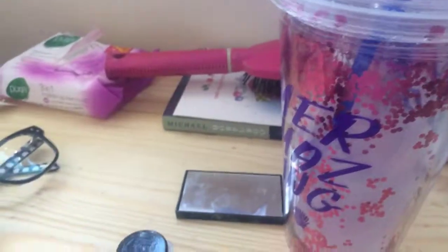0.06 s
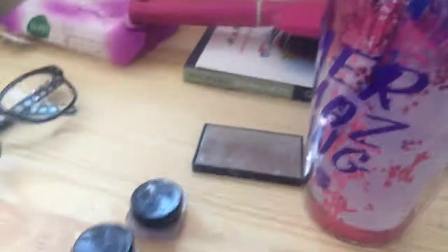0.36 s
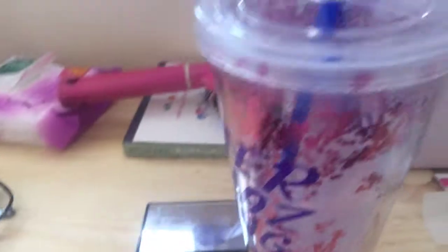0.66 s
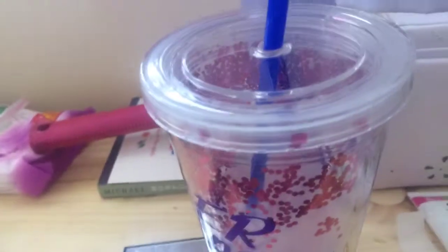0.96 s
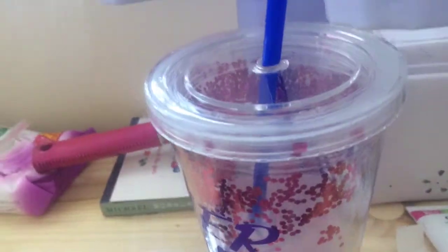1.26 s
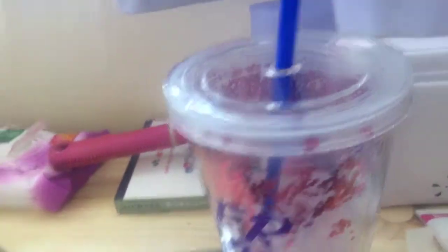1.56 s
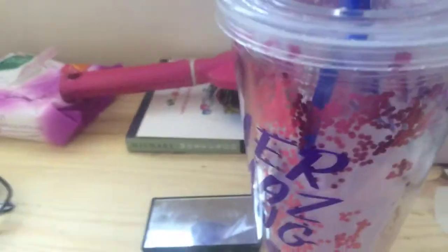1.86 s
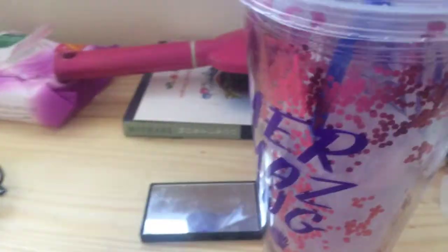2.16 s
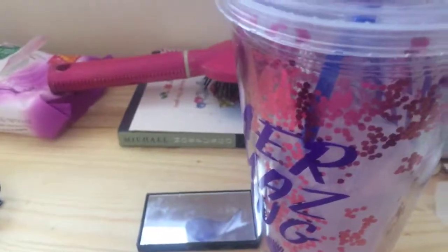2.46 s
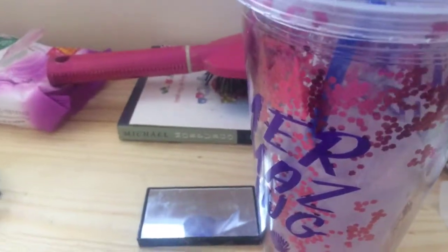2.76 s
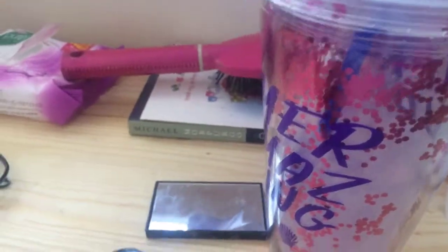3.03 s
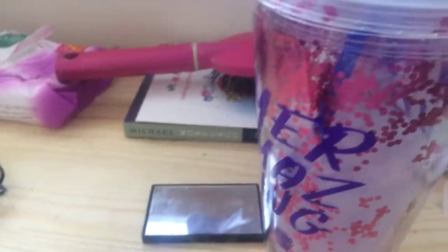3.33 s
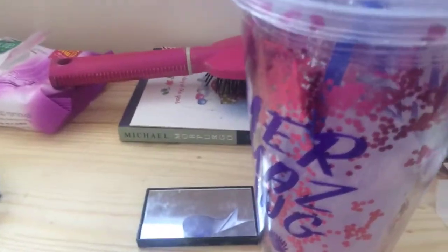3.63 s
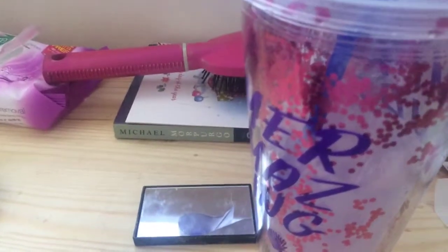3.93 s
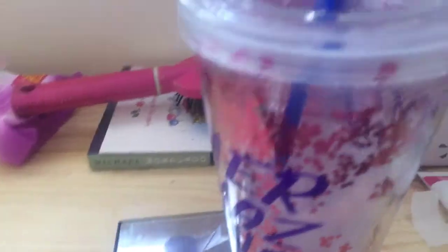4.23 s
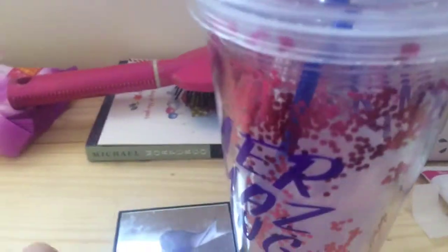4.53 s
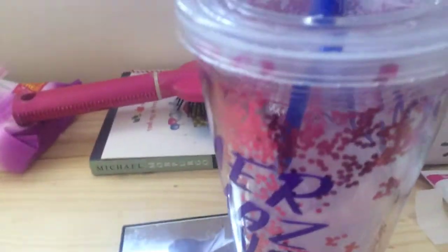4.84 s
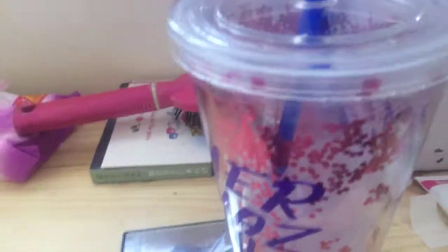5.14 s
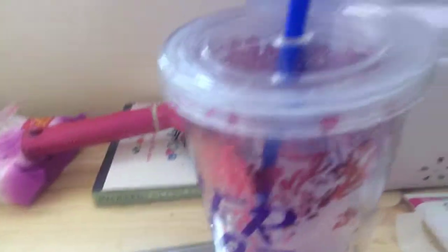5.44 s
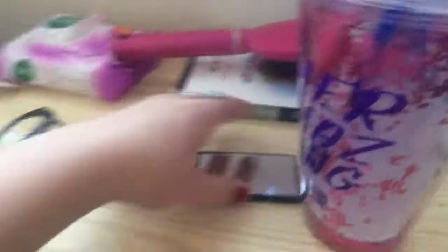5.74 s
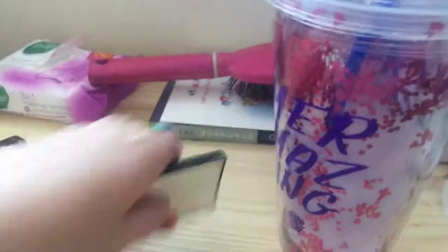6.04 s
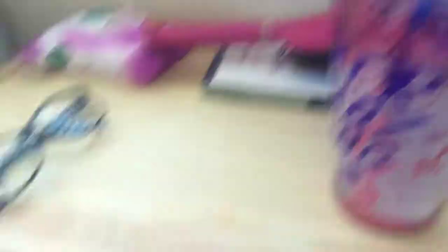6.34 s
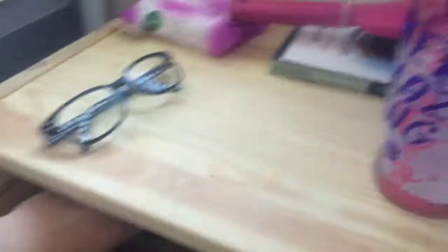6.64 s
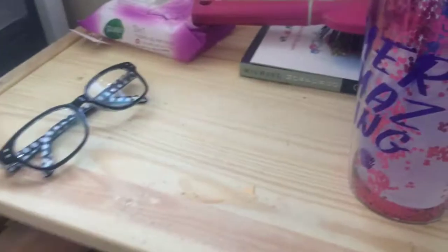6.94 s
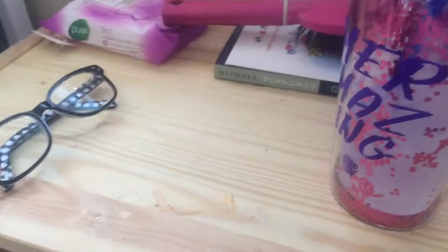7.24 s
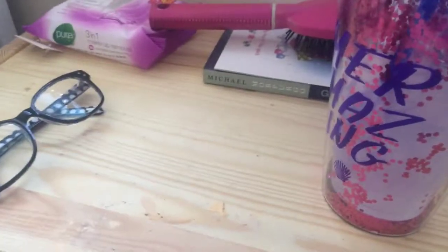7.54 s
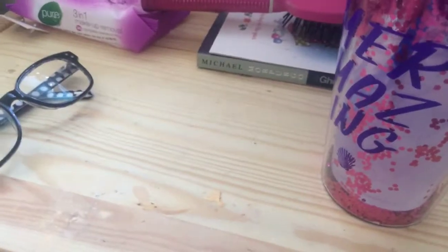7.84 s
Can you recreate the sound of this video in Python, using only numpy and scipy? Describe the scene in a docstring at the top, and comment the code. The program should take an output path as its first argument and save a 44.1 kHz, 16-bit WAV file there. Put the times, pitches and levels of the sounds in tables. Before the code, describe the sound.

Heard up close in a small, quiet room, someone arranges plastic compacts on a wooden desktop. They land with short, uneven clacks and knocks, with little slides and faint handling ticks between them. The activity eases in the middle, then picks up as one case is dragged, snaps sharply against plastic several times and is put down with a louder clack. A low room tone lies underneath.

```python
"""A wooden desk in a small furnished room, heard up close: plastic makeup cases are set down and nudged.
A palette is slid off the desk, knocked, handled with sharp clicks and clapped down among the others.
Hits are short bursts of chatter and slides are streams of tiny slips; both ring the desk top and the
cases, and the room answers. Faint ticks of handling sit over a bed of room tone and hiss."""
import sys
import numpy as np
from scipy import signal
from scipy.fft import rfft, irfft, next_fast_len
from scipy.io import wavfile
from scipy.ndimage import map_coordinates

SR = 44100
rng = np.random.default_rng(int(sys.argv[2]) if len(sys.argv) > 2 else 0)


def transcribe(signal):
    """Save signal, clipped to [-1, 1], as a 16-bit WAV file at the path in sys.argv[1]."""
    frames = np.atleast_2d(signal).T
    limited = np.clip(frames, -1, 1)
    pcm = np.round(limited * 32767).astype(np.int16)
    wavfile.write(sys.argv[1], SR, pcm)


N = 352426

# colour of the room tone and of the hiss: frequency_hz, relative_db
ROOM_TONE_COLOUR = [(15, -32.5), (25, -6.5), (66, 8.5), (149, 12), (309, -2), (591, -1.5), (911, -10.5),
                    (1230, -4), (1520, -11.5), (2350, -13.5), (2610, -15), (6210, -22), (14400, -20),
                    (16000, -24.5)]
HISS_COLOUR = [(500, -33), (2000, 11.5), (5000, 9), (9000, 8), (15500, 1)]
# level of the hiss over time, before its trim: time_s, level_db
HISS_LEVEL = [(0, -70), (0.551, -65.5), (.75, -77), (2.019, -75.5), (2.2, -61), (2.4, -57), (2.619, -72.5),
              (3.502, -69), (4.1, -71.5), (5.24, -75), (5.35, -53), (5.5, -81.5), (6.07, -67.5),
              (6.901, -71), (7.13, -60.5), (7.55, -72), (7.781, -69), (7.95, -54)]
# decay of the room tail: frequency_hz, t60_s
ROOM_DECAY = [(100, 0.44), (400, 0.16), (1500, 0.13), (5000, 0.11), (14000, 0.06)]
# modes of the desk top and of the plastic cases: pitch_hz, relative_db, t60_s
DESK_MODES = [(107.5, 6, 0.16), (142.1, 8.5, 0.31), (231, 6, 0.17), (300, 5, 0.024), (483.6, 0, 0.08),
              (627.5, 8, 0.022), (701, 1, 0.027), (1064, -1.5, 0.011), (1161, 3.5, 0.042),
              (1334, -4.5, 0.066)]
CASE_MODES = [(1630, 3.5, 0.035), (2100, 6, 0.0083), (2290, 3.5, 0.052), (2530, 7.5, .04),
              (2903, 9.5, 0.056), (3190, 6.5, 0.047), (3760, -2.5, 0.21), (4620, 1.5, .025),
              (4930, 1, 0.11), (6060, 8.5, .03), (7000, 8.5, 0.022), (11400, 3, 0.06)]

# fingers shift their grip and edges catch: start_s, end_s, level_db
FIDGETS = [(0.088, 0.292, -61), (0.42, .624, -71.5), (2.775, 3.208, -66.5), (3.899, 4.1, -71),
           (6.198, 6.507, -68.5), (6.9, 7.163, -59.5), (7.699, 7.862, -68)]
# sliding and handling: start_s, end_s, level_db, weight_db, hardness_db
RUBS = [(0.011, 0.044, -36, 8, -14), (0.389, 0.596, -62.5, 16, -22), (.70, 0.718, -49.5, 8, -12),
        (0.879, 0.955, -77.5, 11.5, 10), (1.308, 1.348, -45, 11.5, -10.5), (1.362, 1.465, -61, 10, -3.5),
        (1.632, 1.716, -92.5, 3.5, 21.5), (2.355, 2.397, -33.5, -1, -7), (2.444, 2.491, -45, 9, -9),
        (2.793, 3.003, -65.5, 13, -17), (2.997, 3.156, -67.5, 2, -3.5), (4.193, 4.256, -68.5, 1, 9.5),
        (4.263, 4.285, -51.5, 6, 5), (4.652, 4.746, -46, 5, -8), (4.933, 5.005, -58, 12, -3),
        (5.021, 5.114, -63, 12, -3), (5.11, 5.166, -57.5, -7.5, 8), (5.534, 5.607, -51, 2.5, -6.5),
        (5.62, 5.723, -71, -11, 6.5), (5.736, 5.742, -58, -40, -4.5), (5.757, 5.88, -69.5, -11, 3),
        (5.89, 6.017, -58.5, 6, 7.5), (5.998, 6.041, -40.5, -9, -7.5), (6.048, 6.153, -43, -13.5, 1),
        (6.225, 6.244, -68, -13, 12), (6.289, 6.453, -70, -1, 4), (6.53, 6.572, -66.5, 3, 11),
        (6.574, 6.657, -37, -3.5, 2), (6.65, 6.701, -33, 5.5, -17), (6.806, 6.824, -48, 5, 7.5),
        (7.126, 7.237, -48.5, 3, -17), (7.623, 7.876, -68.5, 15.5, -15.5), (7.718, 7.757, -67, 17.5, -3.5),
        (7.877, 7.98, -43.5, -8, -12.5)]
# a hand or padded edge bumps the desk: time_s, level_db, hardness_db
BUMPS = [(0.055, -33.5, -5), (1.740, -36.5, 2), (2.69, -45, 7.5), (3.016, -46, -26), (3.100, -54, 3),
         (4.253, -42, -10), (4.653, -36.5, 3.5), (4.920, -31.5, -23.5), (5.422, -39, -11),
         (5.897, -49, -11.5), (6.871, -40.5, 1.5)]
# plastic snaps against plastic: time_s, level_db, weight_db, hardness_db, ring_hz
CLICKS = [(.628, -52, 9.5, -2, 1090), (2.767, -45, 9, -9, 2410), (2.955, -40, -16.5, -12, 4010),
          (3.957, -58.5, -16.5, 19, 7100), (5.589, -55, 10.5, 22.5, 8500), (6.085, -34.5, 6, 11.5, 2880),
          (6.780, -33, -3, -6, 2250), (6.7968, -35.5, -2.5, -13, 5240), (6.936, -68.5, 26, 10, 3150),
          (7.073, -33.5, 9, -2, 3300), (7.152, -30, -11, 3, 3370), (7.1631, -34, 0, -5, 3370),
          (7.264, -39.5, -2.5, -2, 3040), (7.292, -59.5, 24, 5, 3330), (7.332, -37.5, -1, -6, 3960),
          (7.412, -36, 2, -3, 3700), (7.468, -36, -8, -4, 3700), (7.8585, -34, 9, -0.5, 6380),
          (7.91, -27, -16, 0, 3620), (7.913, -33, 2, 6, 7560)]
# a case meets the desk: time_s, level_db, weight_db, hardness_db, ring_hz
CLACKS = [(.009, -30.5, 9, 4, 1160), (.037, -39.5, 0.5, -1.5, 980), (.094, -58, 11.5, -10, 1160),
          (0.147, -45.5, 3.5, -23.5, 950), (.236, -61.5, 25.5, -15, 844), (.301, -26.5, -1.5, 0.5, 1370),
          (.485, -51.5, 19, -2, 920), (.619, -42.5, -1, -11, 1120), (.657, -28.5, 5, 0, 2120),
          (.696, -38, -0.5, -12, 1310), (.961, -59, 15, 16.5, 2070), (1.279, -54.5, 10, -3, 854),
          (1.304, -49.5, 10, -11, 1200), (2.069, -44, -6, -6, 1110), (2.081, -37.5, 1.5, 15, 1140),
          (2.150, -28, -1.5, 5, 2460), (2.229, -32, -1.5, -19, 2500), (2.304, -49, 0.5, -14.5, 1010),
          (2.330, -43, -2, -14, 2400), (2.3575, -20.5, 4.5, 17.5, 1310), (2.3866, -25.5, 3, 16, 1220),
          (2.42, -33, 2.5, 4.5, 1240), (2.441, -37, -1.5, -4, 1160), (2.468, -30, -7.5, -16, 2030),
          (2.529, -37.5, 3.5, -6, 1340), (2.553, -49, 3.5, -19, 1170), (2.650, -28.5, -2, 9, 1180),
          (2.755, -41.5, -5, -16, 1256), (2.865, -53, 4, -50, 1170), (3.189, -51, -3.5, -1, 1160),
          (3.212, -31, -7, -2.5, 1280), (3.4429, -20.5, -10.5, -4, 2010), (3.547, -37.5, 2, -17, 1070),
          (3.6373, -30.5, 3, -5.5, 1340), (3.712, -38, 5, -15, 980), (3.760, -30.5, 2, -7.5, 1150),
          (3.833, -22.5, -3, 1, 1360), (4.081, -58, -3, 0, 1930), (4.091, -63, 2, -13.5, 892),
          (5.308, -36.5, 4, -6, 1017), (5.388, -41.5, 8, 7.5, 820), (5.398, -33, 6, -31.5, 1064),
          (6.099, -29, -9, -9, 1230), (6.561, -30.5, 9, 7.5, 1380), (7.198, -41, 1, -2.5, 2850),
          (7.2076, -31.5, 0.5, 5.5, 1044), (7.306, -40, -1, 5, 1180), (7.3507, -26, 3.5, 5.5, 1200),
          (7.3792, -16.5, -3.5, 5, 1315), (7.389, -28.5, -3, 9.5, 1206), (7.949, -37.5, 3, 7.5, 1360),
          (7.967, -36, -5, -2, 1390)]

# borders of the thud, knock, clack, click and tick bands: edge_hz
BAND_EDGES = [70, 250, 800, 2500, 7000, 16000]
BAND_FILTERS = [signal.butter(3, edges, "band", fs=SR, output="sos")
                for edges in zip(BAND_EDGES, BAND_EDGES[1:])]
# EQ of each kind of touch, added to its level: thud_db, knock_db, clack_db, click_db, tick_db
RUB_EQ = (-1.5, -1.5, -1.5, -2, -10.5)
BUMP_EQ = (2, -7, -14.5, -21, -26)
CLICK_EQ = (-19.5, -10.5, -5, 0.5, -9.5)
CLACK_EQ = (-13, 1, 0, -7.5, -22.5)
# weight drives the lows, hardness mostly the higher bands
# boost for each dB of either: thud_db, knock_db, clack_db, click_db, tick_db
RUB_WEIGHT = (0.94, 0.085, 0, 0, 0.02)
RUB_HARDNESS = (0.56, 0, 0.032, 1, 1)
BUMP_HARDNESS = (0.2, 0.57, 1, 0.55, 0.66)
CLICK_WEIGHT = (0.8, 1, 0.59, 0, 0)
CLICK_HARDNESS = (0, 0, 0, 0, 1)
CLACK_WEIGHT = (1, 1, 0, 0, 0)
CLACK_HARDNESS = (0.15, 0, 0, .35, 1)


def amp(db):
    """Decibels to gain."""
    return 10 ** (np.asarray(db) / 20)


def unit(x):
    """Scale to rms 1."""
    return x / np.sqrt(np.mean(x ** 2) + 1e-20)


def along(points, hz):
    """Read a curve of (frequency_hz, value) points on a log axis."""
    point_hz, values = np.transpose(points)
    return np.interp(np.log(hz + 1), np.log(point_hz + 1), values)


def filtered(x, response):
    """EQ a sound with a gain given as a function of frequency."""
    size = next_fast_len(len(x) + SR // 4)
    return irfft(rfft(x, size) * response(np.fft.rfftfreq(size, 1 / SR)), size)[:len(x)]


def noise(colour):
    """Coloured noise of rms 1."""
    return unit(filtered(rng.standard_normal(N), lambda hz: amp(along(colour, hz))))


def wobble(size, per_s):
    """A smooth random curve with per_s knots a second."""
    knots = rng.standard_normal(int(size * per_s / SR) + 4)
    return map_coordinates(knots, [np.arange(size) * per_s / SR])


def add(track, time_s, sound):
    """Mix a sound into the track at its cue."""
    start = max(round(time_s * SR), 0)
    track[start:start + len(sound)] += sound[:max(N - start, 0)]


def room_tone(level_db=-64.0, drift_db=2):
    """The bed: a low rumble that drifts gently in level."""
    return amp(level_db + drift_db * wobble(N, per_s=7)) * noise(ROOM_TONE_COLOUR)


def hiss(trim_db=-3.0, waver_db=2.2):
    """A thin hiss that swells and wavers."""
    ride_db = np.interp(np.arange(N) / SR, *np.transpose(HISS_LEVEL))
    return amp(ride_db + trim_db + waver_db * wobble(N, per_s=30)) * noise(HISS_COLOUR)


def room(x, wet_db, build_s=0.0057, size=8192):
    """The furnished room adds a short tail, fresh each time, in which the lows hang on longest."""
    hz, t, spectrum = signal.stft(rng.standard_normal(size), SR, nperseg=256)
    decay = amp(-60 * t / along(ROOM_DECAY, hz)[:, None])
    _, tail = signal.istft(spectrum * decay, SR, nperseg=256)
    tail *= 1 - np.exp(-(np.arange(len(tail)) / SR / build_s) ** 2)
    return x + amp(wet_db) * signal.fftconvolve(x, tail / np.linalg.norm(tail))[:len(x)]


def resonate(force, modes):
    """The force itself plus the ring it leaves in each mode (pitch_hz, gain_db, t60_s)."""
    sound = force.copy()
    for hz, db, t60_s in modes:
        quality = np.pi * hz * t60_s / np.log(1000)
        peak = signal.iirpeak(min(hz, SR / 2 - 1), quality, fs=SR)
        sound += amp(db) * signal.lfilter(*peak, force)
    return sound


def desk_and_cases(force, case_db, detune, low_cut_hz=85):
    """The desk always rings alike; the cases ring differently with every grip and point of contact."""
    case_modes = np.array(CASE_MODES, float)
    case_modes[:, 0] *= np.exp(detune * rng.standard_normal(len(case_modes)))
    case_modes[:, 1] += case_db + 2 * rng.standard_normal(len(case_modes))
    sound = resonate(resonate(force, DESK_MODES), case_modes)
    return signal.sosfilt(signal.butter(2, low_cut_hz, "high", fs=SR, output="sos"), sound)


def voiced(x, band_db, size):
    """Give a touch its weight and hardness: EQ its first size samples toward the five band levels."""
    band_rms = np.array([np.std(signal.sosfilt(band, x[:size])) for band in BAND_FILTERS])
    centres_hz = np.sqrt(np.multiply(BAND_EDGES[:-1], BAND_EDGES[1:]))
    log_gain = np.column_stack([centres_hz, np.log(amp(band_db) / (band_rms + 1e-12))])
    # minimum phase, so that nothing sounds before the blow
    cepstrum = irfft(along(log_gain, np.fft.rfftfreq(len(x), 1 / SR)))[:len(x) // 2]
    cepstrum[1:] *= 2
    shaped = irfft(rfft(x) * np.exp(rfft(cepstrum, len(x))))
    return shaped * np.linalg.norm(amp(band_db)) / np.std(shaped[:size])


def envelope(size, attack_s, t60_s):
    """The shape of a hit: a fast attack and an exponential decay."""
    t = np.arange(size) / SR
    return (1 - np.exp(-t / attack_s)) * amp(-60 * t / t60_s)


def fidgets(ticks_per_s=18, scatter_db=3, ring_hz=2400, ring_db=9, ring_t60_s=0.0096, size=4096):
    """Nails and lids tick faintly, each with its own pitch."""
    track = np.zeros(N)
    mids = signal.butter(2, [450, 4800], "band", fs=SR)
    for start_s, end_s, level_db in FIDGETS:
        count = max(round((end_s - start_s) * ticks_per_s), 1)
        for time_s in rng.uniform(start_s, end_s, count):
            force = rng.standard_normal(size) * envelope(size, attack_s=0.00077, t60_s=0.019)
            pitch_hz = ring_hz * np.exp(rng.normal(0, 0.5))
            tick = resonate(signal.lfilter(*mids, force), [(pitch_hz, ring_db, ring_t60_s)])
            gain = amp(rng.normal(level_db, scatter_db)) / np.std(tick[:SR // 50])
            add(track, time_s, gain * tick)
    return room(track, wet_db=-14)


def rubs(fade_s=0.028, slips_per_s=1200, grain=0.35, catch_db=4.5, hollow_db=8, hollow_t60_s=0.05):
    """Plastic and fingers drag in uneven catches: a stream of tiny slips shakes the desk and cases."""
    track = np.zeros(N)
    for start_s, end_s, level_db, weight_db, hardness_db in RUBS:
        size = round((end_s - start_s + fade_s) * SR)
        slips = (rng.random(size) < slips_per_s / SR) * rng.standard_normal(size)
        friction = grain * unit(slips) + rng.standard_normal(size) / 2
        fades = signal.windows.tukey(size, min(2 * fade_s * SR / size, 1))
        catches = amp(catch_db * wobble(size, per_s=110))
        force = np.pad(friction * fades * catches, (0, SR // 3 - size))
        # the damped hollow between hand, case and desk colours each stroke anew
        hollow_hz = np.geomspace(700, 6000, 9) * np.exp(0.18 * rng.standard_normal(9))
        scrape = desk_and_cases(force, case_db=-3, detune=0.08)
        scrape = resonate(scrape, [(hz, hollow_db, hollow_t60_s) for hz in hollow_hz])
        eq_db = np.dot([weight_db, hardness_db], [RUB_WEIGHT, RUB_HARDNESS]) + RUB_EQ
        add(track, start_s - fade_s / 2, voiced(room(scrape, wet_db=-18), level_db + eq_db, size))
    return track


def contact(band_db, ring_hz, chatter_t60_s, ring_db=6, ring_t60_s=0.013, split_hz=3500, size=8192):
    """One hit: a brief chatter, its treble first in and first out, rings desk, cases and struck item."""
    lows = signal.lfilter(*signal.butter(2, split_hz, fs=SR), rng.standard_normal(size))
    highs = signal.lfilter(*signal.butter(2, split_hz, "high", fs=SR), rng.standard_normal(size))
    lows *= envelope(size, attack_s=0.0015, t60_s=chatter_t60_s)
    highs *= envelope(size, attack_s=0.00067, t60_s=0.74 * chatter_t60_s)
    blow = desk_and_cases(lows + highs, case_db=-5.5, detune=0.048)
    blow = resonate(blow, [(ring_hz, ring_db, ring_t60_s)])
    return voiced(room(blow, wet_db=-15), band_db, size=SR // 50)


def bumps():
    """Soft blows mostly wake the low modes of the desk."""
    track = np.zeros(N)
    for time_s, level_db, hardness_db in BUMPS:
        eq_db = hardness_db * np.array(BUMP_HARDNESS) + BUMP_EQ
        add(track, time_s, contact(level_db + eq_db, ring_hz=1900, chatter_t60_s=0.04))
    return track


def clicks():
    """Lids and edges snap against each other, short and bright."""
    track = np.zeros(N)
    for time_s, level_db, weight_db, hardness_db, ring_hz in CLICKS:
        eq_db = np.dot([weight_db, hardness_db], [CLICK_WEIGHT, CLICK_HARDNESS]) + CLICK_EQ
        add(track, time_s, contact(level_db + eq_db, ring_hz, chatter_t60_s=0.029))
    return track


def clacks(ordinary_db=-31.5, thud_per_db=0.17):
    """Cases land on the desk: heavy ones knock, hard edges click."""
    track = np.zeros(N)
    for time_s, level_db, weight_db, hardness_db, ring_hz in CLACKS:
        eq_db = np.dot([weight_db, hardness_db], [CLACK_WEIGHT, CLACK_HARDNESS]) + CLACK_EQ
        eq_db[0] += thud_per_db * (ordinary_db - level_db)  # a gentler landing carries relatively more thud
        add(track, time_s, contact(level_db + eq_db, ring_hz, chatter_t60_s=0.031))
    return track


def scene():
    """The mono mix: bed, handling and hits."""
    return (room_tone() + hiss() + fidgets() + rubs() + bumps() + clicks() + clacks())[None]


def record(dry, ceiling=0.95, top_hz=15950):
    """A soft clip rounds off the highest peaks, then a steep low-pass trims the very top."""
    rounded = dry / (1 + np.abs(dry / ceiling) ** 8) ** (1 / 8)
    return np.array([filtered(x, lambda hz: 1 / np.sqrt(1 + (hz / top_hz) ** 160)) for x in rounded])


dry = scene()
out = record(dry)
transcribe(out)
```